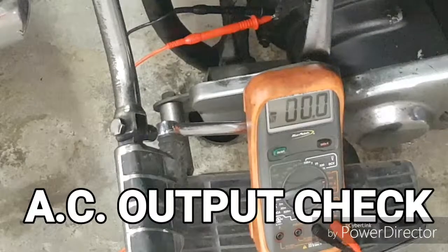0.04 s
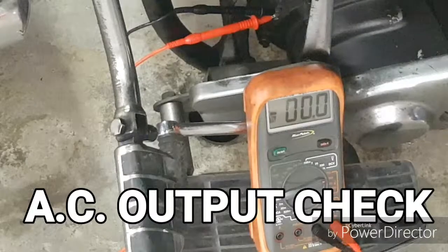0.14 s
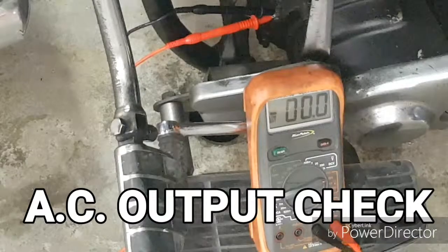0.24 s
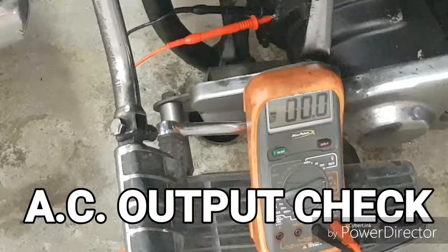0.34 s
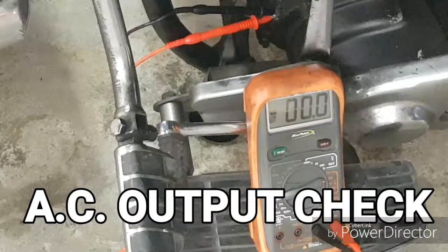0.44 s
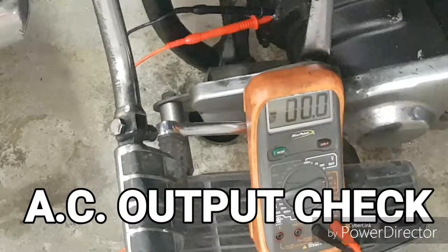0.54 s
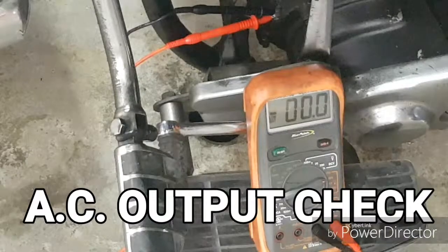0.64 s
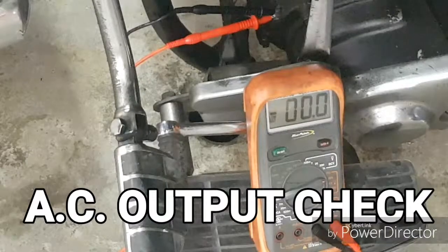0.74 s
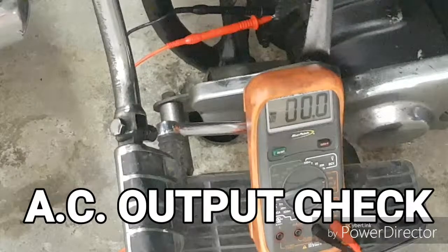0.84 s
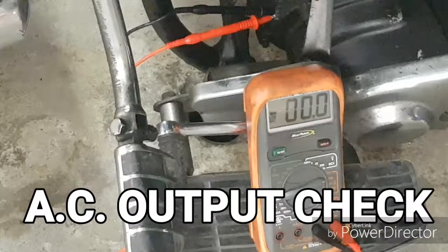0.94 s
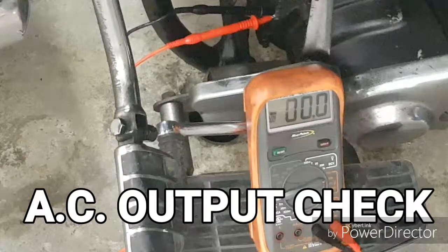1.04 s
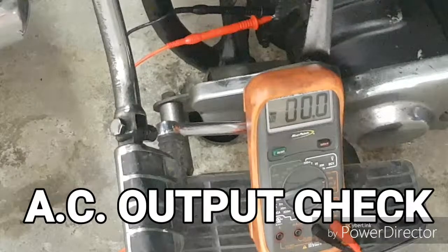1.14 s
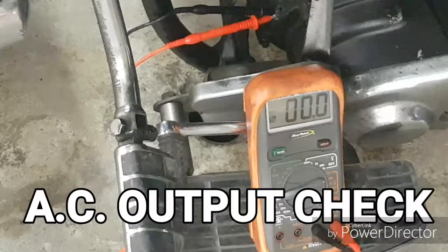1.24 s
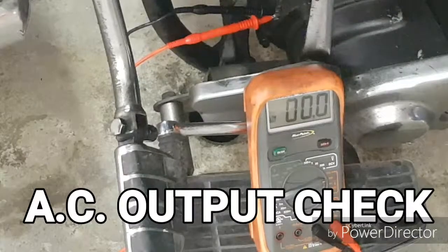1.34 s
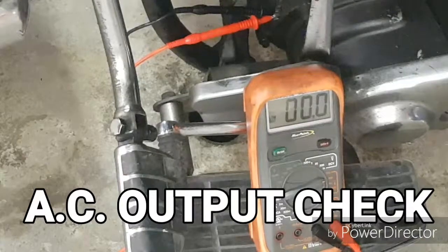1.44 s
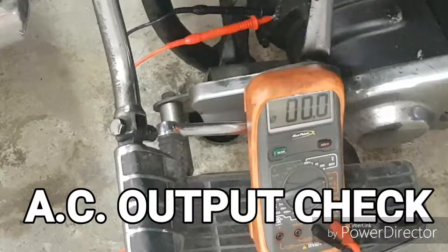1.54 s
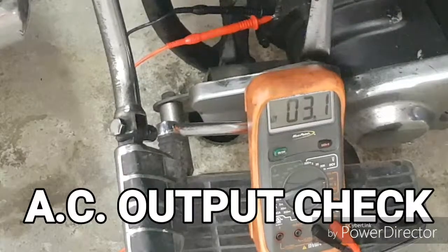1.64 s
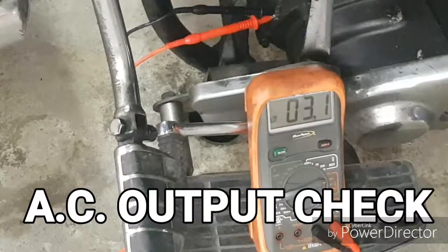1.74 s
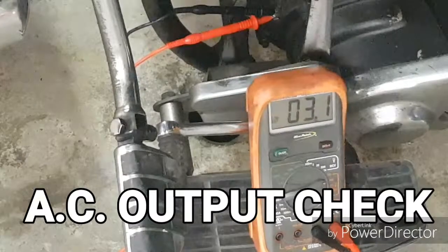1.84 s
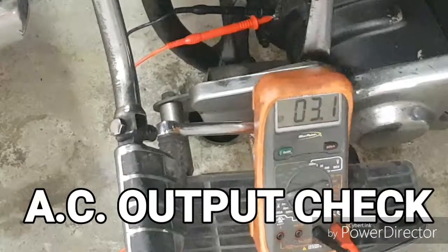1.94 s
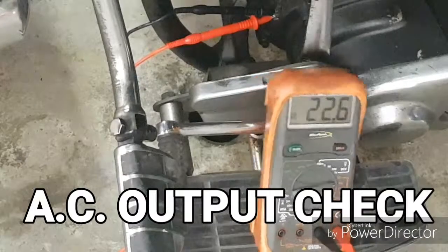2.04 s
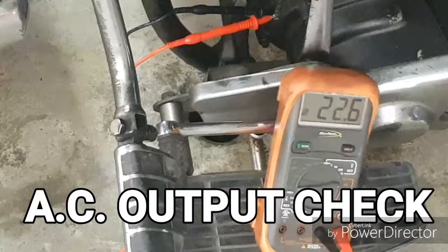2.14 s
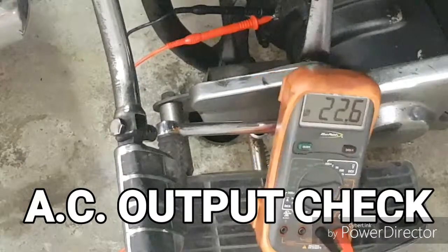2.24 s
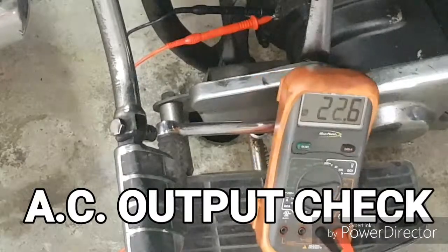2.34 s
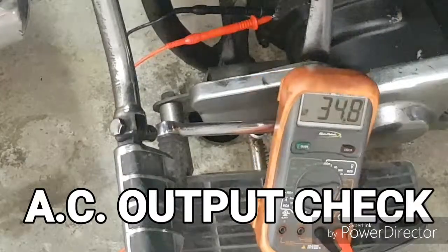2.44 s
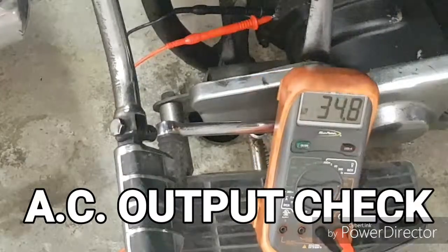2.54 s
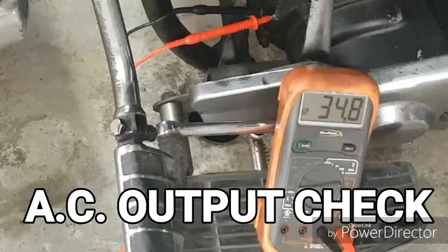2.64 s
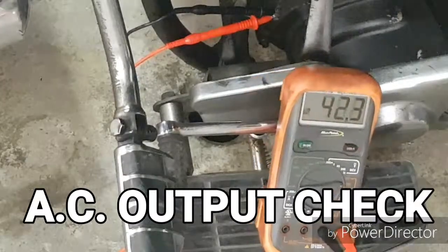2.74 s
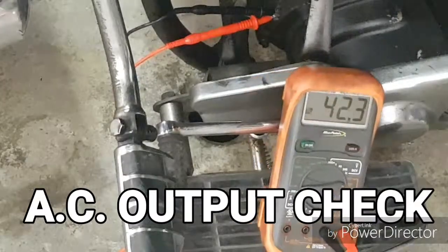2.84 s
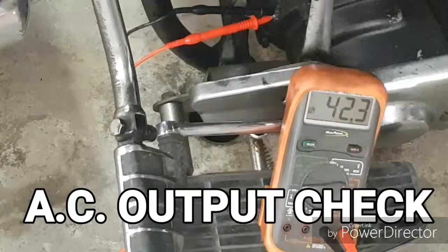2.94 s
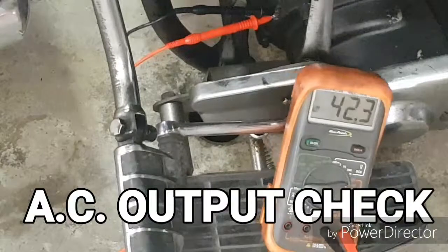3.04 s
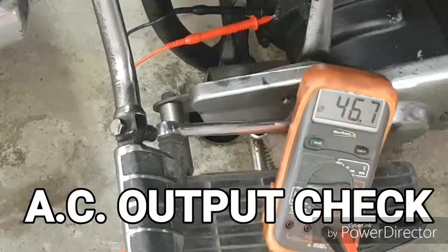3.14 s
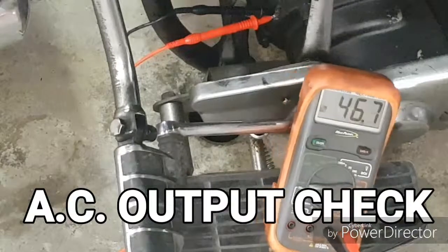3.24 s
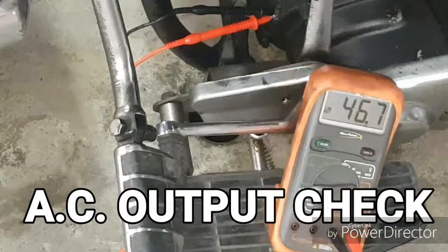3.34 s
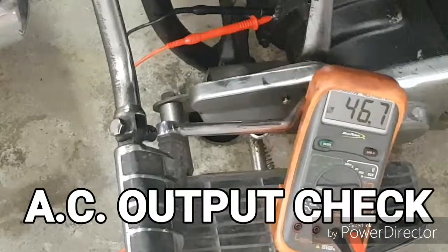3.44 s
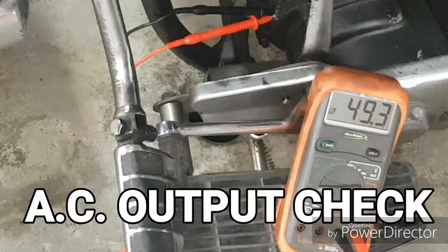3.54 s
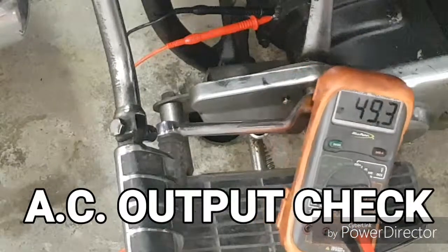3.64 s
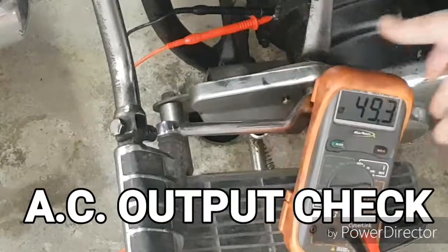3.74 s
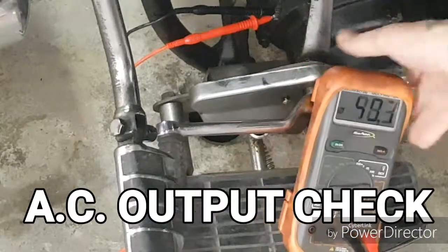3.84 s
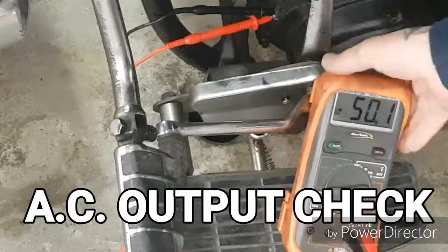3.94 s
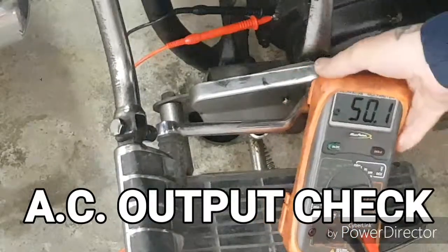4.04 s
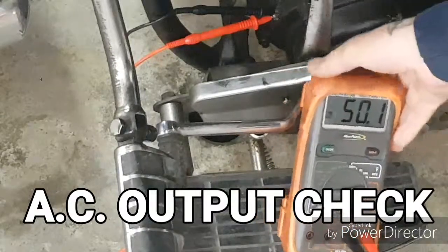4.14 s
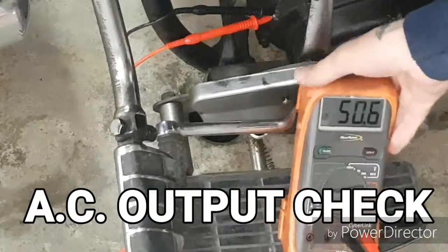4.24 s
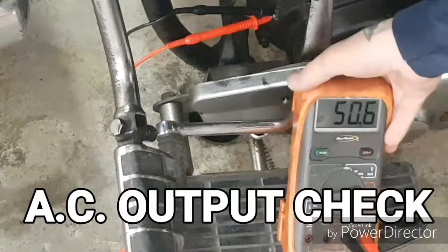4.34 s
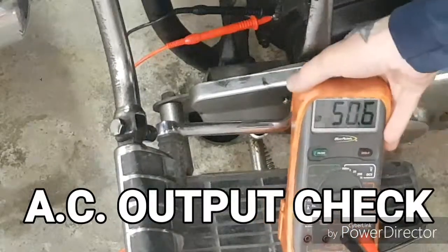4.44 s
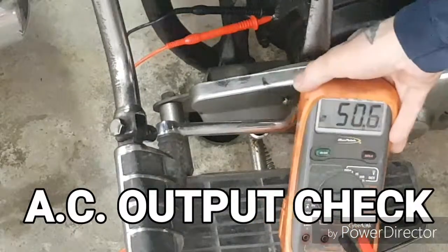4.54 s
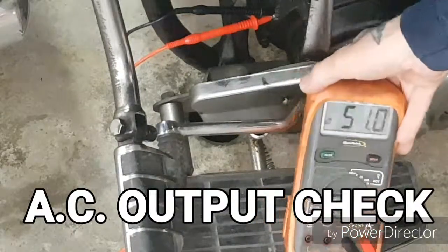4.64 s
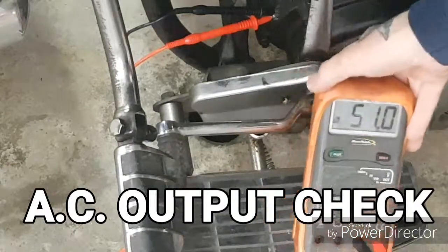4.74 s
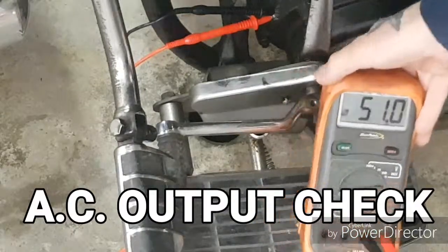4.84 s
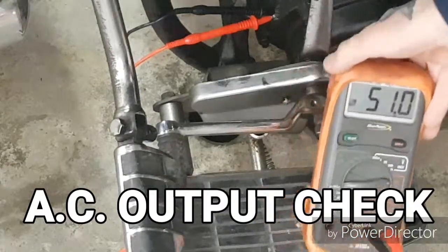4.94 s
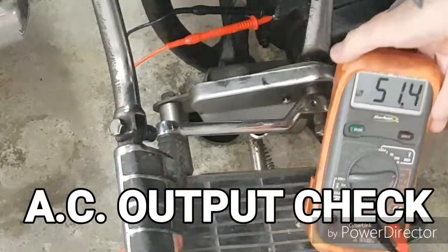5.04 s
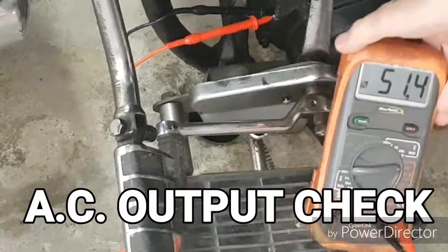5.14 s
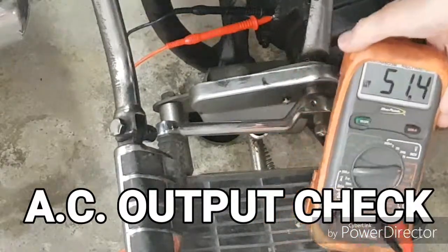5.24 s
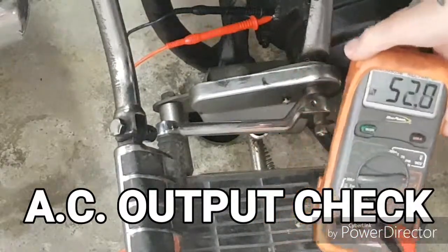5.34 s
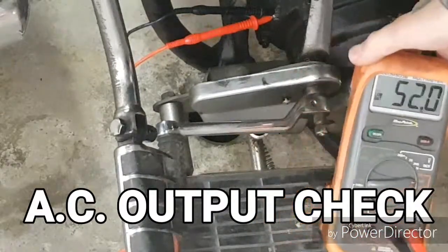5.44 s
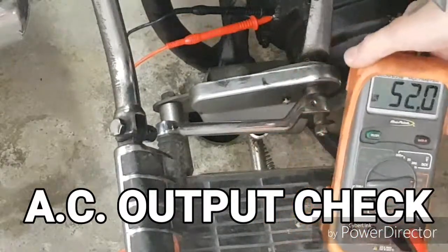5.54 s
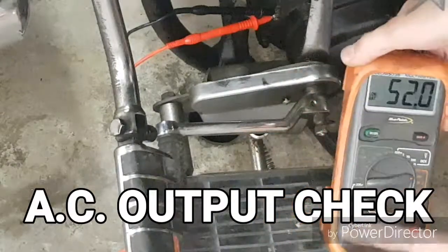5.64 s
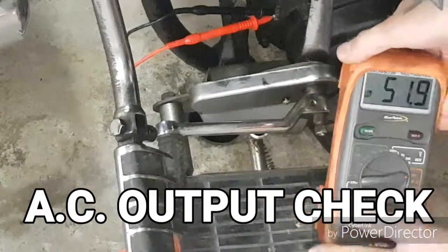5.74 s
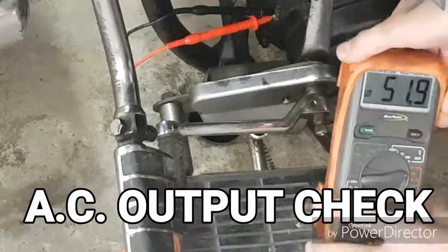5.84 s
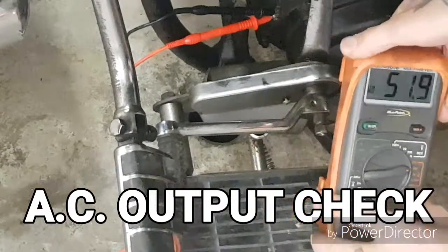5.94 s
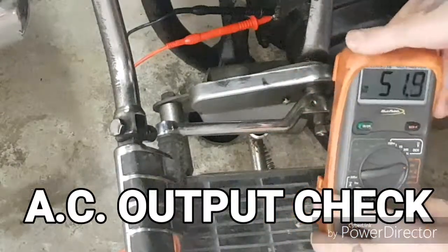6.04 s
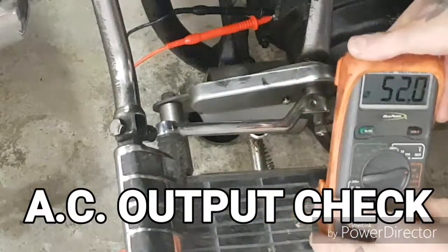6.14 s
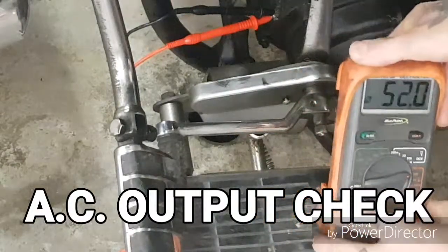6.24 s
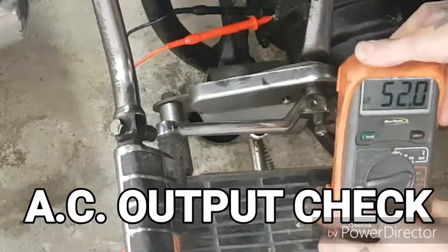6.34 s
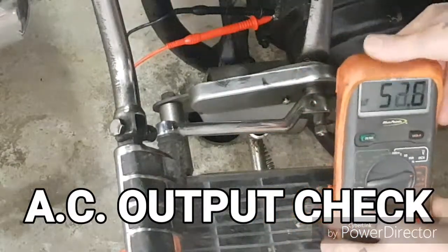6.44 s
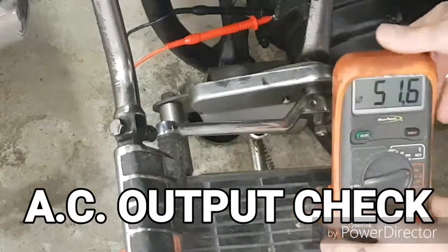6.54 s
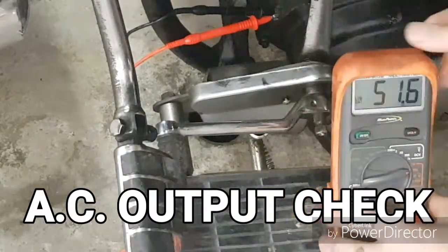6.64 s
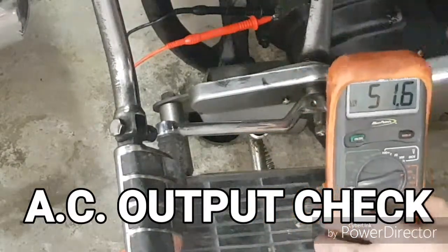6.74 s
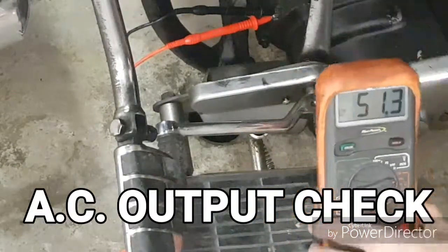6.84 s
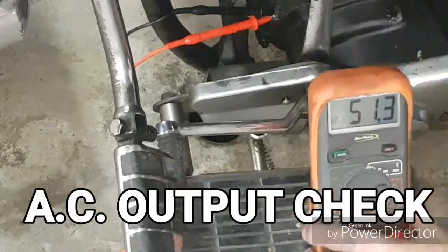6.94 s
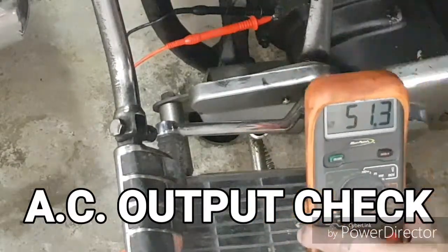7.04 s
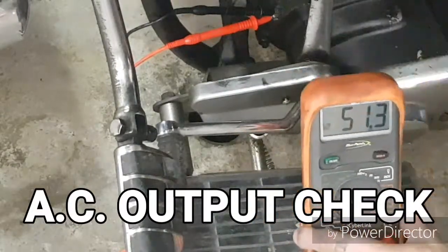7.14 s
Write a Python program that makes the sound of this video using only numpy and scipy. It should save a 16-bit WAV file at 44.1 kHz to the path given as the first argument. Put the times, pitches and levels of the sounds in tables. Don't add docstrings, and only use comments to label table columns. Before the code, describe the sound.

After a second of quiet garage hum, a solenoid clacks, a starter grinds and whines briefly, and a four-cylinder motorcycle engine catches and idles fast.

```python
import sys
import numpy as np
from scipy import signal
from scipy.fft import rfft, irfft, next_fast_len
from scipy.io import wavfile
from scipy.ndimage import uniform_filter1d

SR = 44100
rng = np.random.default_rng(int(sys.argv[2]) if len(sys.argv) > 2 else 0)


def boost(x):
    u = np.asarray(x, float) / 20
    return 10 ** u


def generate_wav(signal):
    frames = np.transpose(np.atleast_2d(signal))
    scaled = np.clip(frames, -1, 1) * 32767
    pcm = np.round(scaled).astype(np.int16)
    wavfile.write(sys.argv[1], SR, pcm)


N = 317520
PAD = next_fast_len(N + SR)
TIME, BIN_HZ = np.arange(N) / SR, np.fft.rfftfreq(PAD, 1 / SR) + 1e-3

# time in seconds, full cycles of four firings per second.
ENGINE_SPEED = [(1.6, 12.0), (1.9, 13.51), (2.2, 13.9), (2.35, 13.3), (2.55, 14.9), (3.15, 16.71),
                (4.2, 17.19), (5.0, 17.49), (5.85, 17.65), (6.0, 17.38), (6.15, 17.44), (6.75, 17.33),
                (6.9, 16.91), (7.2, 16.97)]
# place in the cycle (0 to 1 is one cycle), firing strength in dB, pipe 0 or 1.
CYLINDERS = [(0.838, 4.1, 0), (1.068, 3.3, 0), (1.323, 4.1, 1), (1.587, 2.8, 1)]
# time in seconds, cylinder index, level change in dB.
MISFIRES = [
    (5.84, 0, -20),
    (5.87, 2, -12),
    (6.47, 0, -14),
    (6.58, 0, -14),
    (6.61, 2, -8),
    (6.76, 0, -16),
]
# frequency in Hz, level in dB per Hz.
VALVE_SPECTRUM = [(1800, -4), (3000, -8), (4500, -11.5), (5500, -10), (7660, -8), (9290, -16), (12000, -14),
                  (14600, -18.5), (16000, -22.5)]
# start in seconds, peak level in dB, ring in Hz.
METAL_KNOCKS = [(1.1708, -50, 2500), (1.178, -46, 4910), (1.195, -31, 2960), (1.217, -44, 2550),
                (1.233, -33, 2910), (1.3843, -37, 2830), (1.4505, -40, 2490), (1.6537, -37, 2950),
                (1.68, -28.5, 2810), (1.728, -25, 4650), (1.743, -33, 3950), (1.79, -39, 4000),
                (1.917, -34.5, 2500), (1.9994, -33, 2820), (2.089, -35, 5040), (2.177, -40, 5000),
                (2.222, -51, 5000), (6.5768, -36, 2930)]
# frequency in Hz, side minus mid in dB.
SIDE_SPREAD = [(60, -35), (110, -3.5), (200, -11), (380, -12.5), (700, -7), (1290, -2), (2380, -1),
               (4400, -0.5), (8120, 0.5), (15000, 1)]
CATCH_S, CATCH_ATTACK_S = 1.648, 0.014


def unit(x):
    return x / np.sqrt(np.mean(x ** 2))


def curves(table, off_db=None):
    s, *columns = np.transpose(table)
    return [np.interp(TIME, s, c, off_db, off_db) for c in columns]


def shape(points):
    hz, db = np.transpose(points)
    return boost(np.interp(np.log(BIN_HZ), np.log(hz), db))


def ring(hz, width):
    return 1j * BIN_HZ * width / (hz ** 2 - BIN_HZ ** 2 + 1j * BIN_HZ * width)


def through(x, response):
    return irfft(rfft(x, PAD) * response, PAD)[..., :N]


def walk(rate):
    hold = int(SR / rate)
    steps = np.repeat(rng.standard_normal(N // hold + 1), hold)[:N]
    return 1.89 * uniform_filter1d(uniform_filter1d(steps, hold), hold)


def swell(start, attack, hold=0., fade=1e9):
    s = TIME - start
    return np.clip(s / attack, 0, 1) * np.exp(-np.clip(s - attack - hold, 0, None) / fade)


def diffuse(response, grain_db=0.):
    # frequency in Hz, left minus right in dB.
    port_lean = [(60, -1), (110, 0.73), (200, 0.0), (380, 3.5), (700, 0.64), (1290, 1.5), (2380, 2),
                 (4400, 0.9), (8120, 2), (15000, -5)]
    grains = grain_db * rng.exponential(size=N // 64 + 1).repeat(64)[:N]
    mid, side = rng.standard_normal((2, N)) * boost(grains)
    mid, side = through(mid, response), through(side, response * shape(SIDE_SPREAD))
    lean = np.sqrt(shape(port_lean))
    return np.array([through(mid + side, lean), through(mid - side, 1 / lean)]) / np.std(mid)


def dull(hz, width):
    return unit(through(rng.standard_normal(N), ring(hz, width) ** 2))


def garage(x, t60, wet_db):
    s = TIME[:SR]
    mid, side = rng.standard_normal((2, SR)) * boost(-60 * s / t60) * (s > .004)
    tail = rfft(np.array([mid, side]) / np.linalg.norm(mid), PAD) * boost(wet_db)
    return through(x, 1 + tail[0] + np.array([[1], [-1]]) * tail[1] * shape(SIDE_SPREAD))


def engine():
    # frequency in Hz, width in Hz, signed share.
    wall_modes = [(83.5, 5, .4), (87.5, 5, -.38), (146, 9, .45), (225, 22, -.55)]
    cycle = np.cumsum(curves(ENGINE_SPEED)[0]) / SR
    running = swell(CATCH_S, CATCH_ATTACK_S)
    dry_oil = swell(CATCH_S, CATCH_ATTACK_S, fade=0.77)
    late_rise = swell(4.36, 0.56)
    casing, cover = casing_and_cover(cycle, dry_oil, late_rise)
    walls = 1 + sum(share * abs(ring(hz, width)) ** 2 for hz, width, share in wall_modes)
    boomy = through(exhaust(cycle, running) + casing * running, walls)
    rumble = dull(41, 12) * boost(-47.5)
    close = valves(cycle, dry_oil, late_rise) + cover + rumble + chain(cycle)
    return boomy + close * running + barks_and_pop()


def exhaust(cycle, running):
    # time in seconds, level against steady idle in dB.
    charge = [(1.66, -6.5), (1.74, -4), (1.9, 4.5), (1.96, -2), (2.08, -2), (2.15, -0.5), (2.25, -5.5),
              (2.34, 1), (3.4, -1), (3.8, -0.1), (5, -0.7), (6.45, -1.2), (6.9, 0), (7.2, 0)]
    delay_s, attack_s, fade_s, afterburn_db = 0.044, 0.013, 0.028, 2
    late = np.max([swell(s + delay_s, attack_s, fade=fade_s) for s, _, _ in MISFIRES], axis=0)
    level_db = -24 + curves(charge)[0] + afterburn_db * late
    return garage(pipe_pressure(cycle) * boost(level_db) * running, t60=.5, wet_db=-20)


def pipe_pressure(cycle):
    # frequency in Hz, width in Hz, signed share in pipe 0, in pipe 1.
    pipe_modes = [(64.2, 28.4, -0.069, -0.328), (78.1, 20.5, -0.441, 0.581), (116.3, 14.8, -0.598, 0.443),
                  (136.1, 26.9, 0.344, -0.637), (141.9, 34.7, 0.135, 0.408), (194.5, 9.0, 0.11, -0.193),
                  (207.7, 9.0, 0.059, 0.007), (262.6, 9.0, 0.094, -0.176), (311.9, 19.6, -0.091, -0.093),
                  (376.8, 5.9, 0.19, 0.088), (468, 35, 0.073, 0.033)]
    steady_s, steady_fade_s = 2.15, .06
    cold_scatter_db, warm_scatter_db = 2, .7
    cold_jitter, warm_jitter = .035, .002
    turns = np.arange(int(cycle[-1]))
    pulses = np.zeros((2, N))
    for k, (place, db, pipe) in enumerate(CYLINDERS):
        size_chance, time_chance = rng.standard_normal((len(turns), 2)).T
        s = np.interp(turns + place, cycle, TIME)
        cold = np.exp(-np.clip(s - steady_s, 0, None) / steady_fade_s)
        scatter_db = warm_scatter_db + (cold_scatter_db - warm_scatter_db) * cold
        jitter = warm_jitter + (cold_jitter - warm_jitter) * cold
        size_db = db + scatter_db * size_chance
        for when, cylinder, miss_db in MISFIRES:
            size_db[np.argmin(abs(s - when))] += miss_db * (cylinder == k)
        at = (np.interp(turns + place + jitter * time_chance, cycle, TIME) * SR).astype(int)
        pulses[round(pipe), at] += boost(size_db) * (s > CATCH_S) * (s < TIME[-1])
    pipes = 0
    for hz, width, first, second in pipe_modes:
        pipes = pipes + np.array([[first], [second]]) * ring(hz, width)
    bass_cut = BIN_HZ ** 2 / (BIN_HZ ** 2 - 40 ** 2 - 56j * BIN_HZ)
    return unit(through(pulses, pipes * bass_cut).sum(axis=0))


def barks_and_pop():
    # start in seconds, level in dB.
    header_barks = [
        (1.655, -24),
        (1.712, -30.5),
        (1.77, -30),
    ]
    hold_s, fade_s = .015, 0.027
    gain = sum(boost(db) * swell(s, CATCH_ATTACK_S, hold_s, fade_s) for s, db in header_barks)
    bark = diffuse(ring(295, 280) ** 2, grain_db=2) * gain
    return bark + dull(147, 110) * boost(-21.5) * swell(5.835, 0.0035, fade=0.027)


def casing_and_cover(cycle, dry_oil, late_rise):
    # frequency in Hz, level in dB per Hz.
    casing_spectrum = [(40, -80), (110, -9), (200, -4.5), (300, -6.5), (470, -8), (600, -10), (1150, -16),
                       (1900, -17), (3000, -22), (5000, -31), (6500, -42.5), (11000, -120)]
    # frequency in Hz, width in Hz, level in dB.
    casing_modes = [(306.6, 6, 1), (516, 25, -4), (758, 55, 4.5), (854, 13.5, 2.5), (960, 210, -3),
                    (1435, 66, 2), (1694, 9.2, 7.5), (2144, 78, -1.5), (2500, 90, -3.5), (3616, 25, 5.5),
                    (4250, 40, 3)]
    swell_db = .8 * np.cos(2 * np.pi * (cycle - .55)) + .4 * walk(30)
    strokes = 4 * (cycle - CYLINDERS[0][0]) + 8
    stroke_size = rng.uniform(0, 2, int(strokes[-1]) + 1)[strokes.astype(int)]
    jolt = stroke_size * np.exp(-(strokes % 1) / .35)
    swell_db = swell_db + .8 * (2 * jolt - .65)
    modes = 1 + sum(boost(db) * abs(ring(hz, width)) ** 2 for hz, width, db in casing_modes)
    casing_db = -31 + 1.5 * dry_oil + 0.8 * late_rise
    casing = diffuse(shape(casing_spectrum) * modes, grain_db=-0.96) * boost(casing_db + swell_db)
    cover = diffuse(ring(1565, 120) ** 2, grain_db=0.5) * boost(-50 + 7 * late_rise + 0.66 * swell_db)
    return casing, cover


def valves(cycle, dry_oil, late_rise):
    closings = [(.54, 2), (.96, -4)]  # (place in the cycle, dB)
    ticks = sum(boost(db) * np.exp(-((cycle - place) % 1) / .05) for place, db in closings)
    gain = np.hypot(boost(-45.5 + 5.5 * dry_oil + 2.3 * late_rise), rattle())
    clatter = diffuse(shape(VALVE_SPECTRUM), grain_db=1.5) * (.8 + .6 * ticks)
    return clatter * gain * boost(0.52 * walk(12))


def chain(cycle):
    teeth, casing_hz, casing_width_hz = 48, 745, 80
    off = (teeth * curves(ENGINE_SPEED)[0] - casing_hz) / casing_width_hz
    line = np.sin(2 * np.pi * teeth * cycle + 2.45 * walk(40)) * boost(-37 + 1.1 * walk(30))
    return garage(line * np.exp(-2 * off ** 2), t60=.4, wet_db=-4.5)


def starter():
    # time in seconds, level in dB.
    starter_load = [(1.186, -48), (1.196, -31), (1.208, -34), (1.222, -26.5), (1.364, -29.5), (1.44, -27),
                    (1.47, -28), (1.646, -27), (1.7, -32)]
    # frequency in Hz, level in dB per Hz.
    grind_spectrum = [(47, -34), (80, -26), (113, -18), (230, -9.5), (451, -6), (708, -7.5), (950, -7),
                      (1050, -9), (1900, -7.5), (2220, -14.5), (5000, -33), (6500, -30), (11000, -120)]
    # frequency in Hz, width in Hz, level in dB.
    housing_modes = [(2450, 330, 2), (2950, 780, -1.5), (4000, 880, -10.5), (6870, 600, -14)]
    load_db, = curves(starter_load, off_db=-150)
    hz, whine_gain, octave_gain = bites()
    phase = 2 * np.pi * np.cumsum(hz * (1 + .012 * walk(160))) / SR
    whine = whine_gain * boost(1.5 * walk(120)) * np.sin(phase)
    whine = whine + octave_gain * boost(3 * walk(70)) * np.sin(2 * phase)
    grind = diffuse(shape(grind_spectrum), grain_db=1.0) * boost(load_db - 2.5 + 0.93 * walk(37.87))
    brushes = np.hypot(boost(-55 + 1.5 * (load_db + 31)), rattle() * (load_db > -100))
    hiss = diffuse(shape(VALVE_SPECTRUM), grain_db=-1.0) * brushes * boost(-3.5)
    shell = sum(boost(db) * ring(hz, width) ** 2 for hz, width, db in housing_modes)
    housing = diffuse(shell) * whine_gain * boost(-5.5)
    reverberant = garage(np.sqrt(2) * (whine + growl(load_db)), t60=.3, wet_db=-12)
    return grind + hiss + housing + heave() + reverberant


def bites():
    # start in seconds, length in seconds, first Hz, last Hz, level in dB.
    tooth_bites = [
        (1.213, .013, 945, 935, -32),
        (1.45, .053, 935, 965, -31),
        (1.511, .052, 855, 945, -34),
        (1.571, .026, 970, 945, -29),
        (1.604, .036, 740, 655, -35),
    ]
    edge_s, swell_db, octave_db, sag_db = .003, 7, -2.5, 9
    pitch = []
    for s, length, first, last, _ in tooth_bites:
        pitch += [(s, first), (s + length, last)]
    whine, octave = 0, 0
    for s, length, _, _, db in tooth_bites:
        done = np.clip((TIME - s) / length, 0, 1) - .5
        gate = boost(db) * swell(s, edge_s, length - edge_s, edge_s)
        whine = whine + gate * boost(swell_db * done)
        octave = octave + gate * boost(octave_db - sag_db * done)
    return curves(pitch)[0], whine, octave


def growl(load_db):
    turn_s, top_s, end_s = .085, 1.318, 1.43
    hz = 460 + 105 * np.cos(2 * np.pi * (TIME - top_s) / turn_s) + 40 * walk(150)
    tone = np.sin(2 * np.pi * np.cumsum(hz) / SR) * boost(load_db - 12 + 2.6 * walk(59.9))
    return tone * (1 - swell(end_s, 0.012))


def heave():
    # time in seconds, level in dB, frequency in Hz.
    compressions = [
        (1.26, -45.5, 148),
        (1.36, -41, 150),
        (1.49, -48, 55),
    ]
    return sum(dull(hz, hz) * boost(db) * np.exp(-((TIME - s) / 0.061) ** 2) for s, db, hz in compressions)


def knocks():
    out = np.zeros(N)
    burst = np.exp(-TIME[:600] / 0.0035)
    for (s, db, hz), noise in zip(METAL_KNOCKS, rng.standard_normal((len(METAL_KNOCKS), 600))):
        b, a = signal.iirpeak(hz, 1.2, fs=SR)
        rung = signal.lfilter(b, a, signal.lfilter(b, a, noise * burst))
        hit = rung + 0.11 * noise * burst ** 2
        out[int(s * SR):int(s * SR) + 600] += boost(db) * hit / abs(hit).max()
    thud = 5.7 * through(out, ring(1100, 850))
    return garage(out + thud, t60=0.28, wet_db=2)


def rattle():
    gains = [boost(db - 4.5) * swell(s, .002, fade=0.017) for s, db, _ in METAL_KNOCKS]
    return np.sqrt(sum(gain ** 2 for gain in gains))


def room_tone():
    # frequency in Hz, level in dB per Hz.
    air_spectrum = [(15, -37), (25, -6), (53, -6), (113, 2.5), (188, -8), (240, -11), (290, -9.5),
                    (434, -18), (724, -19), (785, -22), (1460, -22), (8170, -41), (15600, -34)]
    # multiple of the mains frequency, level in dB.
    hum_lines = [(4, -71), (6, -90.5), (8, -91), (9, -89.5), (10, -100), (12, -86.5), (14, -95), (16, -105),
                 (18, -89), (24, -88), (36, -93), (40, -99), (48, -99)]
    # frequency in Hz, level in dB per Hz.
    tail_spectrum = [(100, -20), (300, -8), (900, -6.5), (2500, -8.5), (3500, -15), (6000, -24),
                     (12000, -34)]
    mains_hz, hum = 59.97, 0
    for k, db in hum_lines:
        hum = hum + np.sqrt(2) * boost(db + .5 * walk(5)) * np.sin(2 * np.pi * k * mains_hz * TIME + k)
    air = diffuse(shape(air_spectrum)) * boost(-69.5 - 1.5 + .5 * walk(5.4))
    tail = diffuse(shape(tail_spectrum)) * boost(-64.5 - 68 * TIME)
    return hum + air + tail


def scene():
    return engine() + starter() + knocks() + room_tone()


def band_limit(x):
    return signal.sosfilt(signal.butter(12, 15740, fs=SR, output="sos"), x)


def record(dry):
    ports = np.array([np.r_[0, dry[0, :-1]], dry[1]])
    rounded = np.tanh(3.2 * ports) / 2.85
    top_cut = signal.ellip(8, .2, 70, 15500, fs=SR, output="sos")
    return band_limit(signal.sosfilt(top_cut, rounded))


dry = scene()
out = record(dry)
generate_wav(out)
```